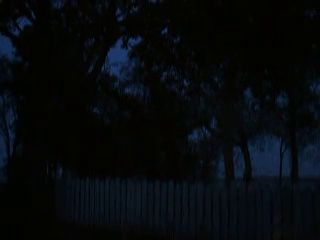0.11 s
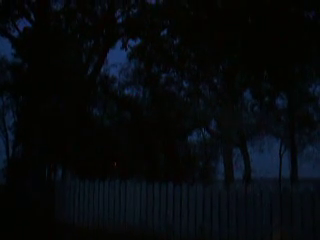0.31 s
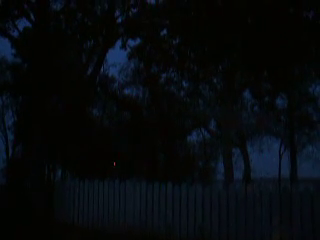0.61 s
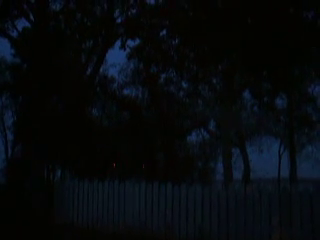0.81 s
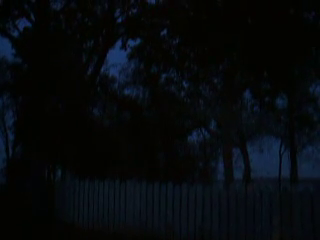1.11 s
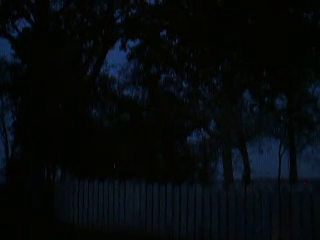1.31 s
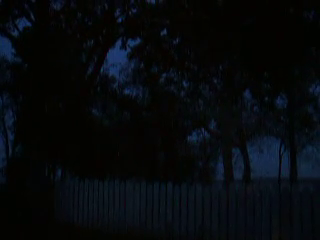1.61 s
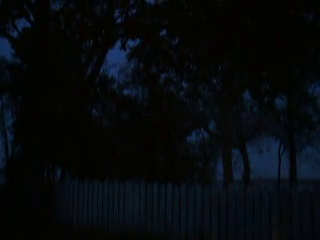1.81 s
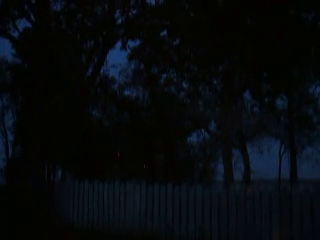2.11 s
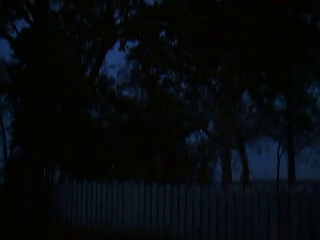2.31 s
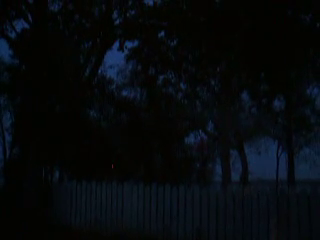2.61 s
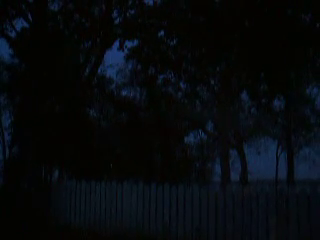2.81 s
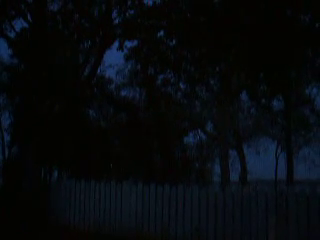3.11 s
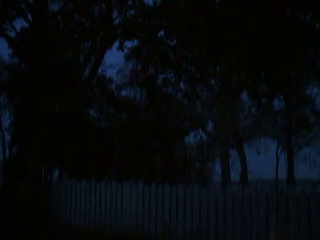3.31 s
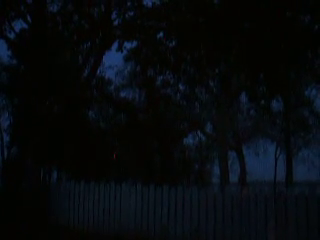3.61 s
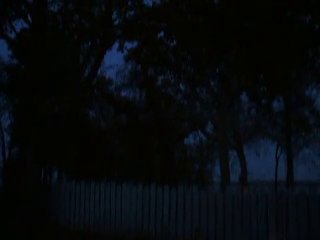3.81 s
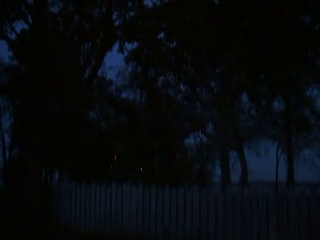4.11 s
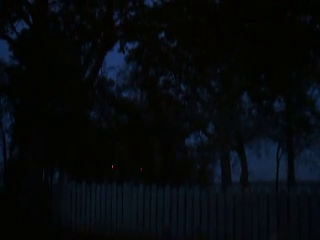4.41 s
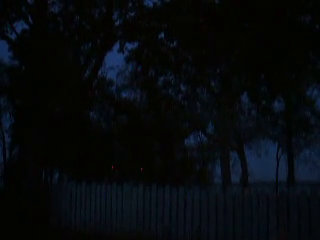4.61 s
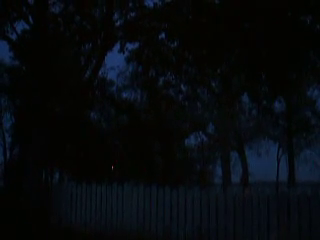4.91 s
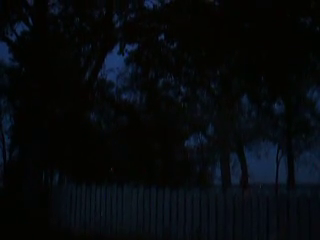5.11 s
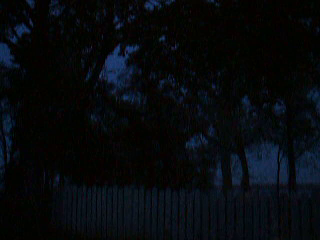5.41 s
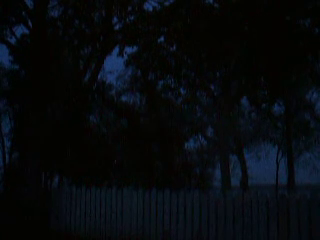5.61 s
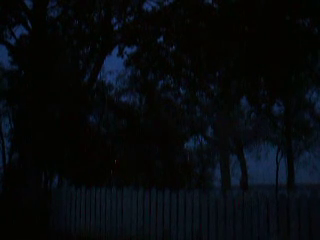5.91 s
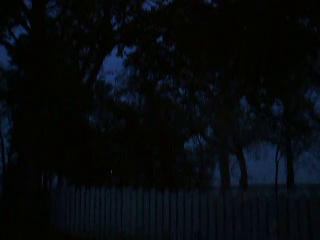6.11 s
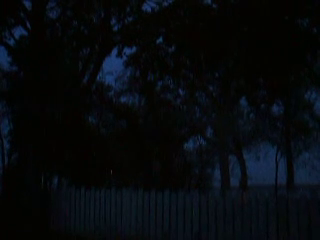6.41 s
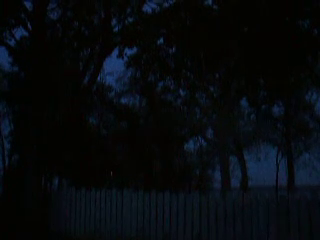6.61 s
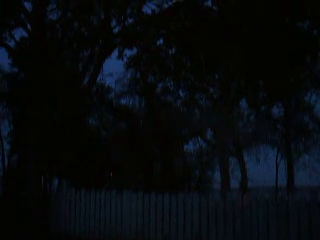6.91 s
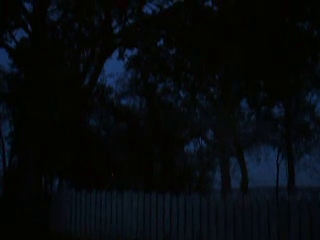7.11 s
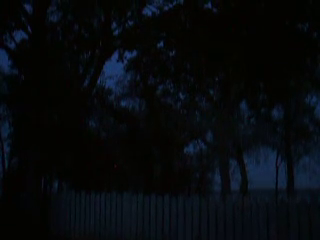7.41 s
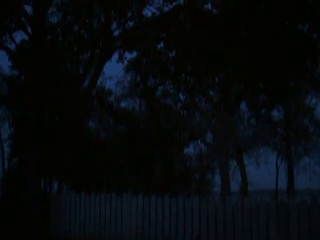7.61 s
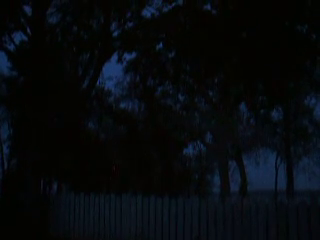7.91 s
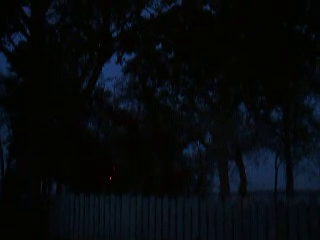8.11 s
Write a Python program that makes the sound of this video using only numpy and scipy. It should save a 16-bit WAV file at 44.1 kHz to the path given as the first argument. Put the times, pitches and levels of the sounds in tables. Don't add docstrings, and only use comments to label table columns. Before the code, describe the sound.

Dawn chorus of many unseen songbirds chirping, whistling and trilling over one another among trees, with faint low hum, steady hiss and thin electronic whine.

```python
import sys
import numpy as np
from scipy import signal
from scipy.io import wavfile
from scipy.ndimage import uniform_filter1d

SR = 44100
rng = np.random.default_rng(int(sys.argv[2]) if len(sys.argv) > 2 else 0)


def convert_level_to_amplitude(level_db):
    exponent = np.asarray(level_db, float) / 20
    return 10 ** exponent


def transcribe(u):
    v = np.clip(np.atleast_2d(u).T, -1, 1)
    q = np.round(v * 32767).astype(np.int16)
    wavfile.write(sys.argv[1], SR, q)


N = 364707


def evened(x):
    return x / np.sqrt(np.mean(x ** 2) + 1e-20)


def read(points, hz):
    f, value = np.transpose(points)
    return np.interp(np.log(hz + 1), np.log(f + 1), value)


def add(mix, s, sound):
    part = mix[round(s * SR):][:len(sound)]
    part += sound[:len(part)]


def tone(hz, db):
    phase = 2 * np.pi * np.cumsum(hz) / SR
    return np.sqrt(2) * convert_level_to_amplitude(db) * np.sin(phase)


def wander(size):
    smooth = uniform_filter1d(rng.standard_normal(N), size)
    return evened(uniform_filter1d(smooth, size))


def echoes(decays, order):
    spacing = 22
    taps = np.zeros(SR // 2)
    at = np.arange(order, len(taps) - spacing, spacing)
    taps[at + rng.integers(0, spacing, len(at))] = rng.choice([-1., 1.], len(at))
    hz, t, z = signal.stft(taps, SR, nperseg=128)
    decay_db = -60 * t / read(decays, hz)[:, None]
    tail = signal.istft(z * convert_level_to_amplitude(decay_db), SR, nperseg=128)[1]
    return tail / np.linalg.norm(tail)


def trees(scatter_db=-99):
    # f/Hz, t60/s
    trunks = [(1500, .55), (3500, .45), (6500, .42)]
    # f/Hz, t60/s
    twigs = [(1500, .05), (6500, .04)]
    return echoes(trunks, order=300) + convert_level_to_amplitude(scatter_db) * echoes(twigs, order=20)


def through_trees(x, wet_db, scatter_db, flutter_db):
    turn = 2 * np.pi * 1.3 * np.arange(N) / SR
    echo = np.zeros(N)
    for k in range(3):
        share = np.sqrt(2 / 3) * np.cos(turn + k * np.pi / 3)
        echo += signal.oaconvolve(x * share, trees(scatter_db - wet_db))[:N]
    direct = x * convert_level_to_amplitude(flutter_db * wander(size=100))
    return direct + convert_level_to_amplitude(wet_db) * echo


def air():
    # f/Hz, level/dB per Hz
    hum_colour = [(20, -75.5), (68, -70), (100, -78.5), (130, -74.5), (190, -71), (245, -82), (500, -82),
                  (1000, -84.5), (1500, -87), (2500, -89.5), (3600, -91.5), (4600, -93.5), (6000, -94),
                  (7300, -106)]
    frames, hz = N // 256 + 5, np.fft.rfftfreq(1024, 1 / SR)
    a, b, patches = rng.standard_normal((frames, 513, 3)).T
    patches = uniform_filter1d(patches, size=10, axis=0)
    patches = evened(uniform_filter1d(patches, size=12, axis=1))
    colour = convert_level_to_amplitude(read(hum_colour, hz)) * (hz < 8000) * (hz > 0)
    z = (a + 1j * b) * colour[:, None] * convert_level_to_amplitude(.9 * patches)
    noise = signal.istft(z, nperseg=1024, noverlap=768)[1][:N]
    return np.sqrt(np.sum(colour ** 2) * hz[1]) * evened(noise)


def crowd(count):
    # t/s, level/dB
    crowd_swell = [(0, -66.5), (.7, -66), (1.2, -57), (2.1, -55), (2.7, -64), (3.4, -57), (4.2, -58),
                   (4.9, -57), (5.5, -55.5), (6.0, -63.5), (6.8, -68), (7.2, -57), (7.8, -55), (8.27, -56)]
    out = np.zeros(N)
    for when, pitch, glide, span in rng.random((count, 4)):
        length = .01 + .02 * span
        u = np.linspace(0, 1, int(length * SR))
        hz = 2200 * 2.1 ** pitch * (1 - (.12 + .25 * glide) * u)
        add(out, when * N / SR, np.sin(np.pi * u) * tone(hz, 0))
    haze = signal.oaconvolve(out, trees())[:N]
    return evened(haze) * convert_level_to_amplitude(np.interp(np.arange(N) / SR, *np.transpose(crowd_swell)))


def whistles():
    # t/s, length/s, from f/Hz, to f/Hz, level/dB
    strokes = [(.112, .02, 6470, 6200, -64.5), (1.124, .03, 3370, 4140, -55),
               (1.513, .034, 3270, 4170, -53), (2.763, .021, 7510, 7020, -57.5),
               (4.423, .03, 4150, 3846, -56.5), (4.485, .027, 4690, 4210, -61),
               (4.808, .03, 3286, 4097, -57), (5.1, .03, 6100, 5410, -60), (5.679, .05, 7250, 6900, -63),
               (5.76, .025, 3750, 3505, -57.5), (6.61, .025, 5680, 5180, -62.5),
               (5.2, .02, 2610, 2723, -53)]
    # t/s, length/s, from f/Hz, to f/Hz, level/dB
    slides = [(.74, .06, 1875, 1785, -58.5), (1.205, .125, 2060, 2560, -54), (1.275, .06, 2200, 2003, -58),
              (1.428, .14, 2047, 1667, -56.5), (2.073, .045, 1950, 1834, -57),
              (2.648, .055, 1948, 2150, -58), (2.805, .27, 1968, 1434, -60), (3.295, .12, 630, 537, -60),
              (5.8, .125, 1920, 1645, -56), (6.383, .068, 1937, 2170, -50), (6.53, .145, 1927, 1633, -55.5),
              (7.505, .058, 2034, 2145, -49), (7.668, .07, 1959, 2170, -52)]
    # t/s, length/s, ends f/Hz, middle f/Hz, level/dB
    arches = [(.405, .105, 2060, 2414, -57.5), (1.109, .115, 2730, 2757, -64.5),
              (1.53, .085, 2732, 2740, -57.5), (1.805, .115, 1995, 2296, -57.5),
              (2.6, .066, 2230, 2244, -53), (4.116, .067, 3150, 3210, -60), (5.166, .11, 3197, 3260, -57),
              (1.905, .1, 3220, 3260, -58), (6.415, .045, 2447, 2510, -57.5), (6.08, .06, 2488, 2433, -63),
              (6.224, .07, 1938, 1760, -55), (6.272, .032, 2358, 2500, -53), (6.292, .09, 2000, 2250, -55),
              (6.3, .04, 2330, 2520, -49.5), (6.341, .042, 2200, 2560, -47.5), (6.81, .06, 2444, 2427, -61),
              (7.0, .07, 3950, 3980, -62.5), (7.27, .035, 2226, 2270, -55), (7.39, .045, 2282, 2470, -50.5),
              (7.432, .058, 2152, 2600, -48), (7.485, .05, 2397, 2575, -55), (7.63, .045, 2415, 2500, -52),
              (8.215, .055, 5190, 5140, -60.5)]
    # t/s, length/s, entry f/Hz, held f/Hz, level/dB
    scoops = [(.855, .065, 2242, 2630, -59.5), (1.638, .087, 2200, 2547, -54.5),
              (2.035, .15, 2227, 2481, -56), (4.935, .075, 2143, 2528, -54), (5.338, .068, 2272, 2500, -52),
              (5.375, .055, 2698, 3060, -55), (5.512, .07, 2108, 2322, -55), (7.841, .06, 3150, 3360, -52),
              (8.225, .045, 3183, 3380, -51.5)]
    # t/s, length/s, entry f/Hz, held f/Hz, level/dB
    drops = [(.94, .15, 2960, 2750, -51.5), (1.326, .17, 2920, 2741, -51), (1.722, .255, 2950, 2690, -54),
             (4.62, .245, 2930, 2690, -57), (5.008, .21, 3200, 2613, -55), (7.665, .19, 2850, 2678, -54),
             (8.06, .15, 2950, 2631, -51), (5.322, .043, 3300, 3190, -54)]
    settle_s, sag_per_s, slide_power = .02, .17, 1.45
    held_fade, slide_fade = 14.5, 15
    accent_db, accent_s, edge_s = 3, .015, .005

    def settling(t, u):
        return np.exp(-t / settle_s)

    def sliding(t, u):
        return (1 - u) ** slide_power

    def arching(t, u):
        return (2 * u - 1) ** 2

    out, waver = np.zeros(N), wander(size=200)
    laws = [(drops + scoops, settling, sag_per_s, held_fade),
            (slides + strokes, sliding, 0, slide_fade),
            (arches, arching, 0, 0)]
    for notes, law, sag, fade_db in laws:
        for s, length, first_hz, second_hz, db in notes:
            start = round(s * SR)
            t = np.arange(0, length, 1 / SR)[:N - start]
            u = t / length
            hz = (second_hz + (first_hz - second_hz) * law(t, u)) * (1 - sag * t)
            hz = hz * (1 + .008 * waver[start:][:len(u)])
            swell_db = 1 + accent_db * np.exp(-t / accent_s) - fade_db * t - 4 * (u - .4) ** 2
            edges = np.minimum(np.minimum(u, 1 - u) * length / edge_s, 1)
            add(out, s, edges * tone(hz, db + swell_db))
    return out


def chips(events, shape):
    ms, hz, shape_db = np.transpose(shape)
    t, out = np.arange(ms[0], ms[-1], 1000 / SR), np.zeros(N)
    track = uniform_filter1d(np.interp(t, ms, hz), size=90)
    height = np.linspace(1, -1, len(t))
    envelope = signal.windows.tukey(len(t), .12)
    pitches = rng.normal(1, .006, len(events))
    for (s, db, *turn), pitch in zip(events, pitches):
        tilt_db, ends_db = turn or (0, 0)
        colour_db = np.interp(t, ms, shape_db) + tilt_db * height - ends_db * height ** 2
        add(out, s + ms[0] / 1000, envelope * tone(track * pitch, db + colour_db))
    return out


def near_chips():
    # t/s, level/dB, tilt to the high start/dB, loss at both ends/dB
    steep_chips = [(0.213, -51, 4, 1.5), (0.383, -52, 0, 2), (0.55, -53.5, -0.5, 2.5), (0.713, -53, 0, 2.5),
                   (0.875, -50, 0.5, 4.5), (1.035, -51, 1.5, 1.5), (1.196, -49, 0.5, 4.5),
                   (1.355, -51, -1, 2.5), (1.515, -53.5, 0.5, 3.5), (1.68, -51.5, 3, 3),
                   (1.842, -49.5, 1.5, 5.5), (2.005, -50.5, 1.5, 3.5), (6.9, -49.5, -1, 3),
                   (7.067, -46, 2, 4.5), (7.231, -48.5, 1.5, -4), (7.394, -47, 2, -1),
                   (7.532, -47.5, 2.5, 3.5), (7.696, -47, 4, 2.5), (7.858, -46.5, 4, 5), (8.019, -48, 4, 3),
                   (8.181, -49, 2.5, 3.5)]
    # t from the beat/ms, f/Hz, level/dB
    steep_sweep = [(-5.5, 5600, -16.5), (-2.5, 4700, -4), (2, 4050, 1.2), (9, 3450, -1.3), (18, 2980, -2.5),
                   (24.5, 2350, -6), (32, 1600, -15)]
    # t/s, level/dB
    kinked_chips = [(2.031, -46.5), (2.198, -45.5), (2.358, -49), (2.521, -47), (2.68, -49), (2.839, -47),
                    (2.997, -47), (3.156, -47), (3.232, -52), (3.312, -47), (3.425, -51), (3.472, -46.5),
                    (3.61, -51.5), (3.63, -47), (3.789, -45.5), (3.949, -47.5), (3.985, -50.5),
                    (4.107, -49), (4.272, -51), (4.55, -50)]
    # t from the beat/ms, f/Hz, level/dB
    kinked_sweep = [(-17, 7000, -22), (-12.5, 5600, -2), (-10.5, 4400, -12.5), (-4.5, 3850, -11.5),
                    (0.5, 3520, 0.5), (7, 3150, -5.5), (13.5, 2200, -16)]
    return chips(steep_chips, steep_sweep) + chips(kinked_chips, kinked_sweep)


def buzzes(notes, per_s):
    out, unsteady = np.zeros(N), wander(size=120)
    for s, length, hz, swing_hz, db in notes:
        n = int(length * SR)
        rate = per_s * (1 + .3 * unsteady[round(s * SR):][:n])
        turns = np.cumsum(rate) / SR
        track = hz - swing_hz * np.cos(2 * np.pi * turns)
        fade_db = np.linspace(2.5, -1.6, n)
        add(out, s, signal.windows.tukey(n, .45) * tone(track, db + fade_db))
    return out


def rasps():
    # t/s, length/s, centre f/Hz, swing f/Hz, level/dB
    far_rasps = [(.724, .045, 4070, 304, -58), (1.365, .04, 3810, 450, -58), (1.47, .03, 5510, 398, -61),
                 (1.69, .07, 3764, 412, -56.5), (1.85, .032, 3626, 609, -53), (1.88, .086, 5255, 252, -63),
                 (2.01, .05, 3703, 503, -54), (2.165, 0.027, 4510, 782, -56),
                 (2.339, .043, 4340, 585, -56.5), (3.591, .065, 4060, 502, -59),
                 (3.77, .03, 4975, 878, -57.5), (3.935, .056, 4935, 410, -60.5),
                 (4.68, .035, 3035, 299, -56), (7.461, .04, 3870, 189.5, -55)]
    return buzzes(far_rasps, per_s=75)


def slurs():
    # t/s, level/dB, tilt to the high start/dB, loss at both ends/dB
    slur_calls = [(1.023, -53.5, 1.7, 0.5), (2.072, -55, -2, 1), (3.225, -54, -0.7, 2), (4.32, -55, 3, 0.5),
                  (5.495, -49, 5, 4.5), (6.437, -53.5, -2.5, 3.5), (7.483, -55.5, -2.5, 3)]
    # t from the beat/ms, f/Hz, level/dB
    slur_sweep = [(-17.5, 6300, -6), (-5.5, 6230, -1.5), (8, 5800, -3), (16, 5580, 1.5), (24, 5420, 1),
                  (31, 5150, -3.5), (37, 5400, -14.5)]
    return chips(slur_calls, slur_sweep)


def trills():
    # t/s, length/s, level/dB
    trill_ends = [(1.13, .125, -55), (1.525, .08, -53), (1.905, .11, -54.5), (4.813, .12, -55.5),
                  (5.21, .15, -56.5), (7.865, .065, -51.5)]
    centre_hz, swing_hz = 3693, 431.5
    return buzzes([(s, length, centre_hz, swing_hz, db) for s, length, db in trill_ends], per_s=63)


def warbles():
    # t/s, length/s, centre f/Hz, swing f/Hz, level/dB
    rough_warbles = [
        (4.51, .1, 2234, 217, -57),
        (6.33, .065, 2400, 200.3, -53.5),
        (7.43, .058, 2248, 240, -51),
        (7.57, .055, 2186, 170, -50.5),
        (8.005, .05, 2490, 201, -53),
    ]
    return buzzes(rough_warbles, per_s=55)


def vees():
    # t of the lowest point/s, level/dB
    vee_calls = [
        (5.848, -47.5),
        (6.959, -49),
        (7.979, -48.5),
    ]
    # t from the lowest point/ms, f/Hz, level/dB
    vee_sweep = [(-68, 3560, -10), (-58, 3470, -3), (-28, 3220, 2), (-12, 2600, -8), (-2, 2320, -7),
                 (16, 2470, -1.5), (37, 3000, 2.5), (52, 3080, 0.8), (61.5, 3110, -8.5)]
    return chips(vee_calls, vee_sweep)


def scene():
    birds = through_trees(near_chips(), wet_db=-3, scatter_db=-3, flutter_db=0.9)
    songs = whistles() + vees() + warbles()
    birds += through_trees(songs, wet_db=-5, scatter_db=-11, flutter_db=3.0)
    birds += through_trees(slurs(), wet_db=1.9, scatter_db=-3.0, flutter_db=1.5)
    birds += through_trees(trills() + rasps(), wet_db=-0.8, scatter_db=-3, flutter_db=0.5)
    return (birds + crowd(count=2500) + air())[None]


def roll_off(x):
    return signal.sosfilt(signal.butter(12, 8810, fs=SR, output="sos"), x)


def record(dry):
    # f/Hz, level/dB
    camera_whine = [(5939.8, -71.5), (7648, -83), (7677.6, -74), (7707, -73.5), (7736.5, -83)]
    bit_step, zero_offset = 1 / 128 / np.sqrt(2), -.0752
    whine = sum(tone(np.full(N, hz), db) for hz, db in camera_whine)
    sampled = signal.resample_poly(dry[0] + whine, 160, 441, window=("kaiser", 12))
    rounded = bit_step * np.round((sampled + zero_offset) / bit_step)
    soft = signal.firwin(32 * 441 + 1, 1 / 441, window=("kaiser", 9))
    lifted = signal.resample_poly(rounded, 441, 160, window=soft, padtype="mean")[:N]
    return roll_off(lifted[None])


dry = scene()
out = record(dry)
transcribe(out)
```